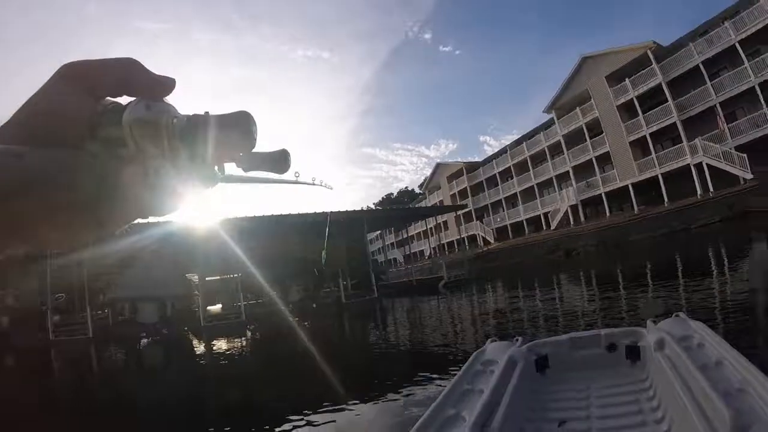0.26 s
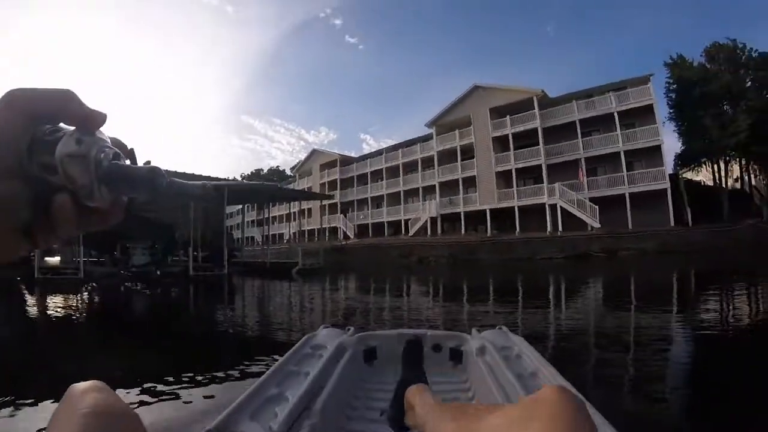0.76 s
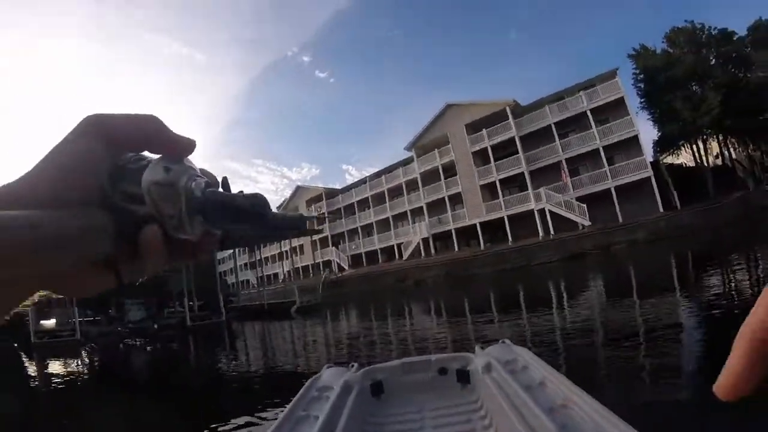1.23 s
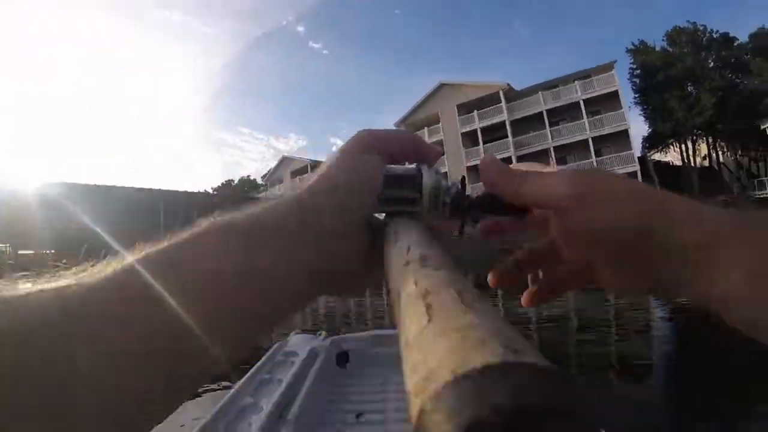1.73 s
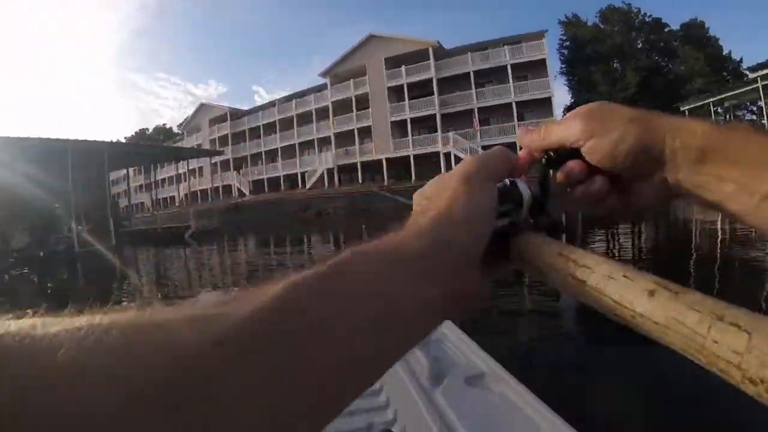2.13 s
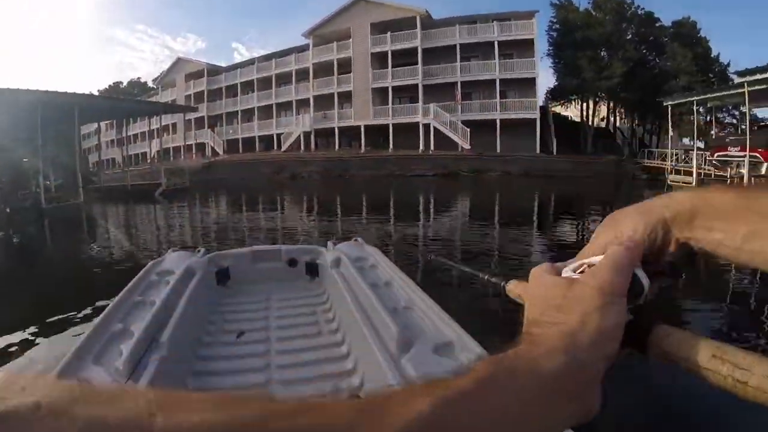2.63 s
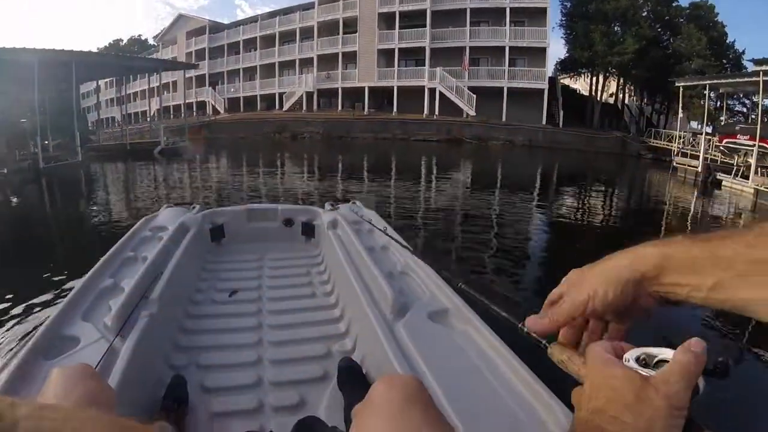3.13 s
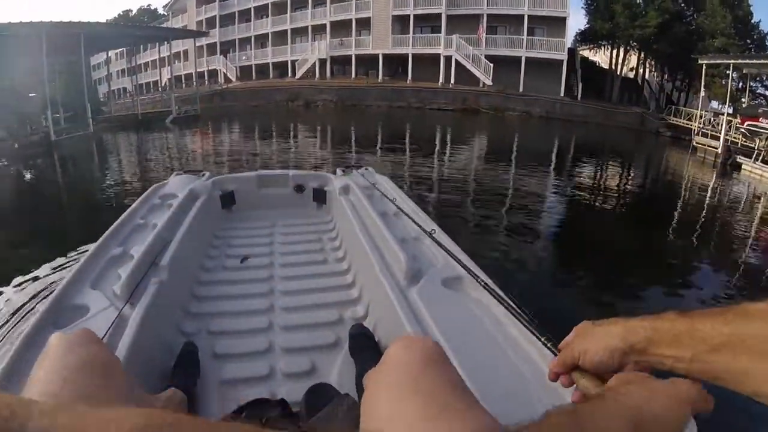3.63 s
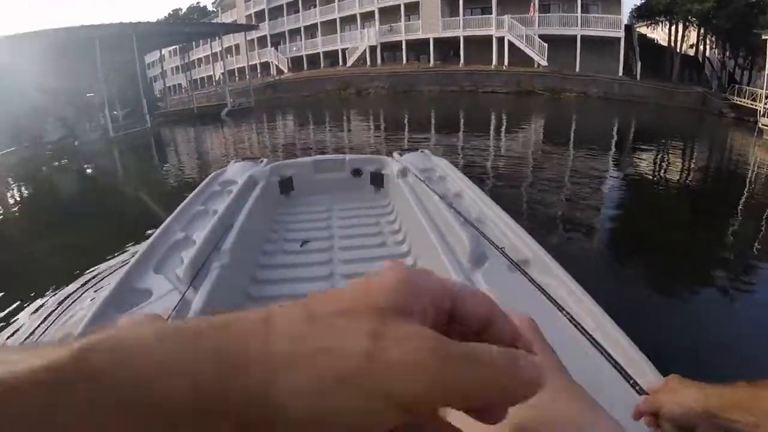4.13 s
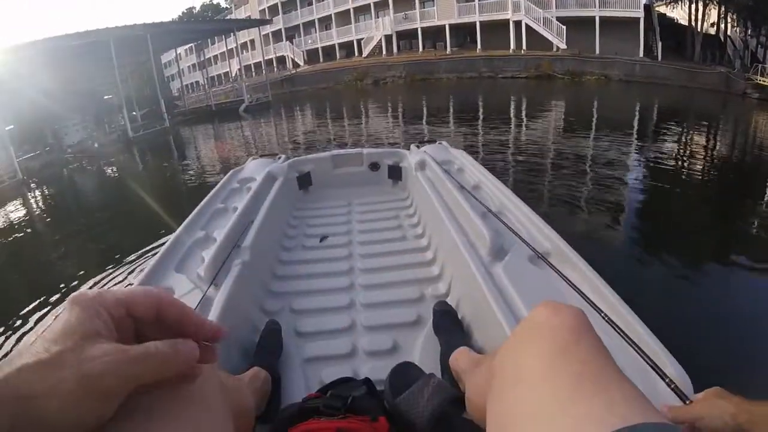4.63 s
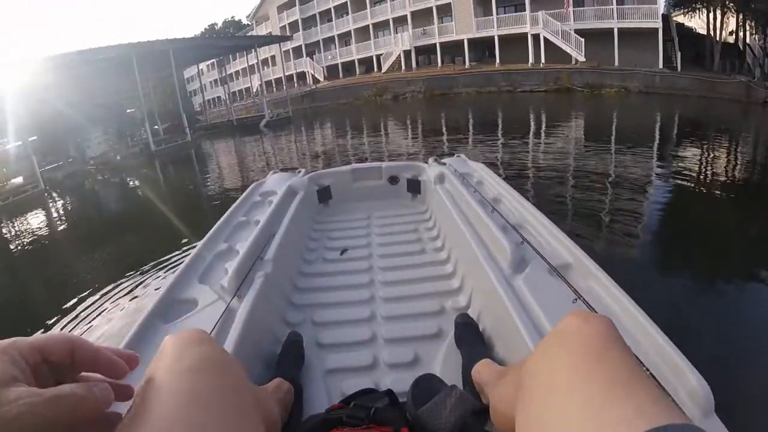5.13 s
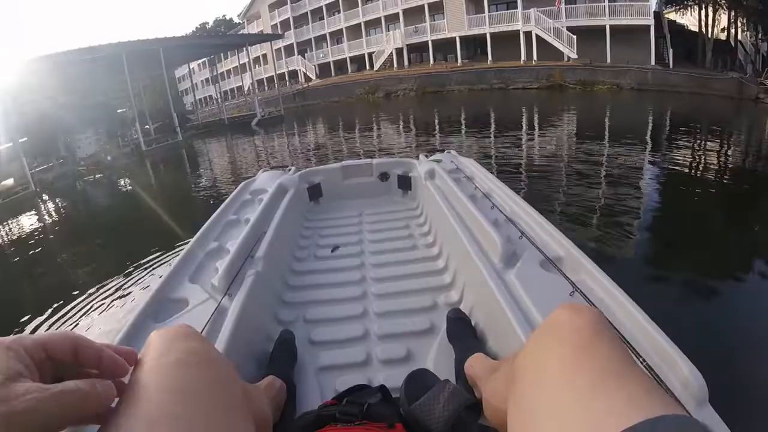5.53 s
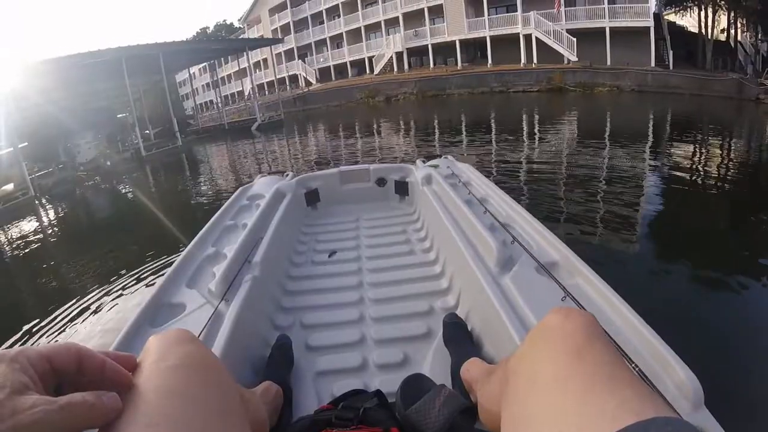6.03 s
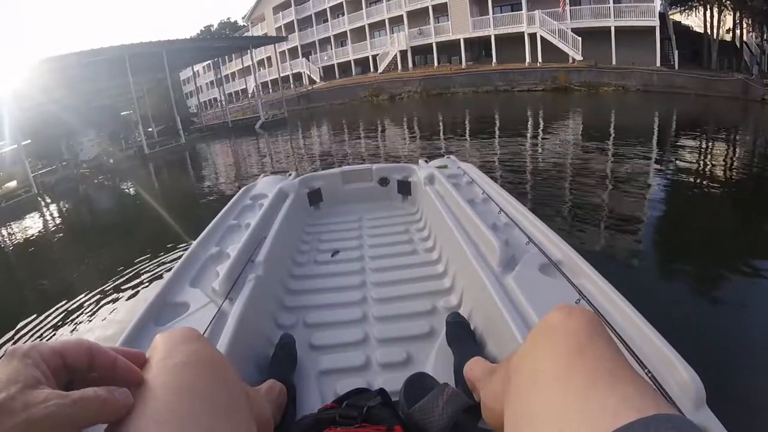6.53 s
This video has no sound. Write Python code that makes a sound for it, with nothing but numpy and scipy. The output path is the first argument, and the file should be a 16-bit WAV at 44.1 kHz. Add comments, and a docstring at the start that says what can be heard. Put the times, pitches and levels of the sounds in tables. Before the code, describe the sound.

Close handling clicks and dull hull knocks from fishing tackle in a plastic boat, with pauses between, above a sinking motor drone and faint buzz.

```python
"""A fishing reel and rod are handled in a plastic kayak on a calm lake: blows ring the damped modes of metal
and plastic parts, which tick, rattle and clink. The rod knocks on the hull, the weight of the paddler thuds it,
the seat creaks by stick-slip and hands rub as dense grains. Behind them a distant engine drones with falling
pitch, a compressor on the shore taps its casing into a buzz, and the air is shaped noise."""
import sys
import numpy as np
from scipy import signal
from scipy.io import wavfile

SR = 44100
rng = np.random.default_rng(int(sys.argv[2]) if len(sys.argv) > 2 else 0)


def elevation(decibels):
    """Turn decibel levels (scalar or array-like) into linear amplitude ratios."""
    levels = np.asarray(decibels, float)
    return 10 ** (levels / 20)


def log_audio(samples):
    """Write samples as a 16-bit WAV file to the path given in sys.argv[1]."""
    # one column per channel
    frames = np.atleast_2d(samples).T
    # limit to full scale, then quantise
    limited = np.clip(frames, -1, 1)
    pcm = np.round(limited * 32767).astype(np.int16)
    wavfile.write(sys.argv[1], SR, pcm)


N = 298557

# modes of the grip: f/Hz, relative level/dB, t60/s
GRIP_MODES = [(590, 9.5, 0.0043), (840, 5.5, 0.0024), (1041, -7, 0.025)]
# modes of the rod blank: f/Hz, relative level/dB, t60/s
ROD_MODES = [(1402, 0.07, 0.018), (1622, 1.5, 0.02), (2005, -1, 0.013)]
# modes of the reel frame: f/Hz, relative level/dB, t60/s
FRAME_MODES = [(2365, 5.5, 0.01), (2840, -1, 0.013), (3260, -3, 0.017), (3644, -0.5, 0.006),
               (4080, -5, 0.0083), (4660, -8.5, 0.012)]
# modes of small reel parts: f/Hz, relative level/dB, t60/s
PART_MODES = [(5120, -2, 0.0043), (5870, 1.5, 0.0065), (6373, 0.5, 0.021), (6615, -3, 0.024),
              (7140, 8, 0.0015), (8730, -7, 0.0036)]
# modes of the hull: f/Hz, relative level/dB, t60/s
HULL_MODES = [(121, -36, 0.2), (167.2, -18.5, 0.17), (205, -17, 0.14), (256, -12, 0.034), (322, -17, 0.084),
              (449.7, -17.5, 0.098), (508, -16, 0.067), (611, -13, 0.069), (798, -21, 0.047),
              (1044, -16, 0.0093)]

RUB_RISE_DB_PER_S = 425
HARD_CONTACT_S = .00002


def rms_one(x):
    """Normalization: scales a signal to unit rms."""
    return x / np.sqrt(np.mean(x ** 2) + 1e-20)


def in_time(rows):
    """Linear interpolation: columns of a curve, sample by sample."""
    s, *columns = np.transpose(rows)
    return [np.interp(np.arange(N) / SR, s, c) for c in columns]


def drift(rate_hz):
    """Low-passed noise: two equal poles at rate_hz leave slow chance of spread 1."""
    pole = np.exp(-80 * np.pi * rate_hz / SR)  # one step is 40 samples
    white = rng.standard_normal(N // 40 + 2002)
    slow = signal.lfilter([1], [1, -2 * pole, pole * pole], white)[2000:]
    return np.interp(np.arange(N) / 40, np.arange(len(slow)), rms_one(slow))


def ring(force, hz, t60):
    """Damped resonator: a unit click sets a decaying sine of height 1 ringing."""
    radius, angle = elevation(-60 / (t60 * SR)), 2 * np.pi * hz / SR
    feedback = [1, -2 * radius * np.cos(angle), radius * radius]
    return signal.lfilter([0, np.sin(angle)], feedback, force + 1e-18)


def narrow(x, hz, width_hz):
    """Resonance: its bandwidth sets its decay time; scaled to rms 1."""
    return rms_one(ring(x, hz, np.log(1000) / (np.pi * width_hz)))


def band(x, low_hz, high_hz):
    """Band-pass filtering: keeps what lies between two corner frequencies."""
    return signal.sosfilt(signal.butter(2, [low_hz, high_hz], "band", fs=SR, output="sos"), x)


def strike(times, levels_db, modes, scatter_db, chatter_s, grit):
    """Modal excitation: a short swell of force, gritty after a sharp touch or smooth, drives every mode."""
    at, out = (np.asarray(times) * SR).astype(int), np.zeros(N)
    # every blow drives every mode with a strength of its own
    scatter = scatter_db * rng.standard_normal((len(at), len(modes)))
    levels_db = np.reshape(levels_db, (len(at), -1)) + scatter
    rise, fade = np.exp(-1 / (0.55 * chatter_s * SR)), np.exp(-1 / (chatter_s * SR))
    swell_gain = np.sqrt(1 - fade ** 2) * (1 - rise)
    swell_poles = np.convolve([1, -fade], [1, -rise])
    first_touch, grit_share = .45, .85
    for k, (hz, level_db, t60) in enumerate(modes):
        blows = np.zeros(N)
        np.add.at(blows, at, elevation(levels_db[:, k] + level_db))
        swell = signal.lfilter([swell_gain], swell_poles, blows + 1e-18)
        if grit:
            touch = first_touch * (-1) ** k * blows
            force = touch + grit_share * swell * rng.choice([-1, 1], N)
        else:
            force = -swell
        out += ring(force, hz, t60)
    return out


def tail(x, decay_s, low_hz, high_hz):
    """Envelope following: loose material shakes on as noise that follows the blow and dies away."""
    shaking = signal.lfilter([1], [1, -np.exp(-1 / (decay_s * SR))], np.abs(x))
    return shaking * band(rng.standard_normal(N), low_hz, high_hz)


def air():
    """Filtered noise: far traffic, water and microphone hiss in half-octave bands that each flicker."""
    # spectrum of the background: f/Hz, relative density/dB per Hz
    spectrum = [(13, -41), (22, -40), (58, -1.5), (177, -3.5), (259, -10.5), (349, -11.5), (950, -31.5),
                (2140, -32), (3680, -38.5), (4330, -42.5), (5830, -26), (8990, -48.5), (10300, -51),
                (12400, -61), (14200, -72)]
    overall_db, fall_db_per_s = -45, 0.4
    table_hz, table_db = np.transpose(spectrum)
    edges = 22 * 2 ** np.arange(0, 9.6, .5)
    together = drift(1.2)
    white = rng.standard_normal((2, N))  # neighbouring bands take different noise
    out = 0
    for k, (low, high) in enumerate(zip(edges, edges[1:])):
        level_db = np.interp(np.log(low * high) / 2, np.log(table_hz), table_db)
        flicker_db = 1.2 * together + 2.46 * drift(16.6)
        out = out + elevation(level_db + flicker_db) * band(white[k % 2], low, high)
    return elevation(overall_db - fall_db_per_s * np.arange(N) / SR) * rms_one(out)


def engine():
    """Harmonic synthesis: three shaft multiples carry over the water and waver in the air."""
    # course of the engine: t/s, shaft f/Hz, then level/dB of the fifth, sixth and eighth multiple
    course = [(0, 30.05, -46, -46, -63), (.9, 29.36, -47, -47, -60), (1.5, 28.14, -56, -48.5, -74),
              (2.5, 26.7, -53.5, -47.5, -53), (3.1, 25.8, -63, -45, -48), (4.15, 25.25, -52, -51.5, -46),
              (5.4, 24.87, -63, -49, -44), (6.77, 24.52, -75, -54.5, -45)]
    hz, *levels_db = in_time(course)
    turn = 2 * np.pi * np.cumsum(hz * (1 + 0.0011 * drift(1.75))) / SR
    out = 0
    for multiple, db in zip((5, 6, 8), levels_db):
        out = out + elevation(db + 1.2 * drift(1.74)) * np.sqrt(2) * np.sin(multiple * turn)
    return out


def drones():
    """Narrow-band noise: resonances filled with noise give further low drones."""
    # drones: f/Hz, width/Hz, level/dB, fall/dB per s
    drone_rows = [(62.1, 2.7, -48.5, -0.1), (106.1, 5.0, -47.5, 3.0), (123.3, 3.7, -55.5, -0.5),
                  (352.2, 8, -64.5, -0.2)]
    out = 0
    for hz, width, db, fall_db in drone_rows:
        level_db = db - fall_db * np.arange(N) / SR
        out = out + elevation(level_db) * narrow(rng.standard_normal(N), hz, width)
    return out


def compressor():
    """Periodic excitation: a strong and a weak valve tap per turn, with some hiss, ring the casing."""
    # resonances of the casing: f/Hz, width/Hz, level before shading/dB
    casing = [(2096, 27, -72), (2615, 40, -79.5), (3004, 76, -82), (3675, 230, -75.5), (4620, 110, -70.5),
              (5090, 83, -68.5), (5655, 63, -71), (6400, 75, -72)]
    # shading of the buzz: t/s, then level/dB from 2.4 to 4.2 kHz, to 5.3 kHz, to 6 kHz, above
    shading = [(0, 5, 0, -9, 5), (.7, 8, -0.5, 8, 4), (1.5, 1.5, 2, 7.5, 7.5), (2.1, 1.5, 0.5, 2, 4),
               (2.4, 7.5, -14, 10, 4), (3.4, 9.5, 3, 10, 6.5), (3.6, 8.5, -20, 8.5, 8),
               (5.5, 9, -28, 3.5, -15), (6.1, 5.5, -12, 4, -14), (6.77, 7, -3, 2, -9)]
    mean_turns_hz = 58.09
    phase = np.cumsum(2 * mean_turns_hz * (1 + 0.0004 * drift(4.0))) / SR
    count = np.floor(phase)
    tap = np.diff(count, prepend=0) * np.where(count % 2, .35, 1)
    force = tap * elevation(0.13 * drift(22.0)) + elevation(-39.5) * rng.standard_normal(N)
    shading_db = [0, *in_time(shading)]  # the lowest resonance is steady
    out = 0
    for hz, width, db in casing:
        region = np.searchsorted([2400, 4200, 5300, 6000], hz)
        out = out + elevation(db + shading_db[region]) * narrow(force, hz, width)
    return out


def thuds():
    """Bending vibration: the paddler's weight pushes slowly and bends the hull as a whole."""
    # thuds: t/s, strength/dB
    pushes = [(0.452, -35), (1.364, -27), (1.98, -32), (4.29, -33), (6.313, -23.5)]
    # bending modes of the hull: f/Hz, relative level/dB, t60/s
    bending_modes = [(41, -31, 0.37), (56.7, -30.5, 0.24), (86.8, -24, 0.27)]
    s, strength_db = np.transpose(pushes)
    out = strike(s, strength_db, bending_modes, scatter_db=4.5, chatter_s=0.0015, grit=False)
    return band(out, 42, 400)


def slide():
    """Sliding friction: cloth drives the seat resonances with noise that starts fast and dies away."""
    # resonances of the seat under cloth: f/Hz, width/Hz, relative level/dB, fall/dB per s
    seat_rings = [(550, 130, 2.5, 56), (824, 120, 2.5, 57), (2260, 220, -9, 22.5)]
    start_s, start_db = 1.335, -51.5
    after = np.arange(N) / SR - start_s
    level_db = start_db - RUB_RISE_DB_PER_S * np.clip(-after, 0, 1) + 2.0 * drift(26.0)
    out = 0
    for hz, width, db, fall_db in seat_rings:
        gain = elevation(level_db + db - fall_db * np.clip(after, 0, 4))
        out = out + gain * narrow(rng.standard_normal(N), hz, width)
    return out


def creak(count=7):
    """Stick-slip: evenly spaced slips ring the seat, then a last, stronger one as the load settles."""
    start_s, gap_s, settle_s, settle_db = 1.228, .0152, 1.38, -34.5
    loudest_s, loudest_db, sag_db_per_s = 1.282, -38, 154
    s = start_s + gap_s * np.arange(count)
    slip_db = loudest_db - sag_db_per_s * np.abs(s - loudest_s)
    # modes of the seat: f/Hz, relative level/dB, t60/s
    seat = [(750, -2, 0.077), (970, 6, 0.029), (1390, 2.0, 0.022), (2280, -18, 0.02)]
    return strike([*s, settle_s], [*slip_db, settle_db], seat, scatter_db=0.0, chatter_s=0.0014, grit=True)


def rubbing():
    """Exponential envelopes: gains of low and high rustle, as each rub rises fast, holds and fades."""
    # rubs of the hands: t of the firmest touch/s, low level/dB, high level/dB, time held/s
    rubs = [(.4, -39.5, -50, 0.019), (.51, -50.5, -55, .03), (1.25, -54, -64, 0.079),
            (1.928, -76, -80, 0.04), (2.86, -51.5, -66, 0.14), (3.06, -61, -67, 0.04),
            (3.31, -57, -73, 0.034), (3.42, -58, -69, 0.08), (3.99, -45, -62, 0.022),
            (4.14, -56.5, -77, 0.06), (4.32, -44, -60, 0.085), (4.45, -46, -48.5, 0.013),
            (5.0, -42, -50.5, 0.012), (5.12, -50, -61, 0.042), (6.27, -49.5, -57, 0.014)]
    fall_db_per_s = 91
    t = np.arange(N) / SR
    low, high = elevation(-72), elevation(-65.5)  # hands at rest still fidget
    for s, low_db, high_db, held_s in rubs:
        rise_db = -RUB_RISE_DB_PER_S * np.clip(s - t, 0, 1)
        fall_db = -fall_db_per_s * np.clip(t - s - held_s, 0, 1)
        shape = elevation(rise_db + fall_db)
        low, high = low + elevation(low_db) * shape, high + elevation(high_db) * shape
    return low, high


def rustle():
    """Granular friction: dense clumped grains ring hull, grip and blank (low) or blank and reel (high)."""
    low_modes = HULL_MODES[4:] + GRIP_MODES + ROD_MODES[1:2]
    high_modes = ROD_MODES[2:] + FRAME_MODES + PART_MODES
    grains_per_s = 1800
    out = 0
    for gain, modes in zip(rubbing(), (low_modes, high_modes)):
        size_db = 1.1 * np.minimum(rng.exponential(1, N), 4) + 2.36 * drift(45.0)
        sizes = elevation(size_db) * rng.choice([-1, 1], N)
        grains = sizes * (rng.random(N) < grains_per_s / SR)
        rings = 0
        for k, (hz, _, t60) in enumerate(modes):  # all modes equally strong, damped by the hand
            rings = rings + rms_one(ring(grains, hz, 0.45 * t60)) * (-1) ** k
        out = out + gain * rms_one(rings)
    return out


def knocks():
    """Local excitation: a soft inward push on the hull favours modes near the pitch of the struck spot."""
    # knocks: t/s, strength/dB, f around which the struck spot rings/Hz
    hull_knocks = [(1.338, -33, 352), (1.372, -43, 121), (2.944, -33, 480), (3.226, -29.5, 463),
                   (3.937, -25.5, 520), (4.278, -16, 535), (4.284, -28, 506), (4.311, -17, 560),
                   (4.322, -24, 596), (4.330, -34, 600), (4.362, -23.5, 483), (4.408, -28, 430),
                   (4.434, -26.5, 203), (4.983, -14, 550), (4.993, -23, 452), (5.056, -17.5, 464),
                   (5.056, -7, 202), (5.059, -20, 114), (5.067, -19, 172), (5.080, -24, 298),
                   (5.122, -15, 237), (5.144, -28, 251.5), (5.157, -20, 196), (5.176, -22, 816),
                   (5.19, -30.5, 806), (5.216, -21, 590), (5.228, -26, 800), (5.241, -24, 302),
                   (5.262, -34, 760), (5.437, -21, 372), (5.501, -30, 347), (5.54, -29, 340),
                   (6.239, -28.5, 350), (6.252, -28.5, 452), (6.282, -18, 345), (6.305, -26, 201),
                   (6.332, -26.5, 171), (6.358, -28, 150), (6.757, -35, 250)]
    s, strength_db, spot_hz = np.transpose(hull_knocks)
    octaves = np.log2(np.array(HULL_MODES)[:, 0] / spot_hz[:, None])
    levels_db = strength_db[:, None] - 24.4 * octaves ** 2
    out = strike(s, levels_db, HULL_MODES, scatter_db=1.5, chatter_s=0.00013, grit=False)
    out = band(out, 85, 3400)  # the hull radiates no deep bass
    return out + elevation(-49.0) * tail(out, 0.053, 66, 304)


def clinks():
    """Local excitation: a hard blow on thin metal favours modes near the pitch of the struck spot."""
    # clinks: t/s, strength/dB, f around which the struck spot rings/Hz
    metal_blows = [(0.498, -28, 2050), (0.51, -28, 3030), (0.556, -28, 2080), (2.93, -21, 3570),
                   (3.936, -24, 3152), (4.311, -25.5, 3040), (4.982, -28, 2620), (4.991, -32, 2520),
                   (5.079, -41, 3085)]
    # modes of thin metal on the rod: f/Hz, relative level/dB, t60/s
    metal_modes = [(2050, 1, 0.03), (2440, -2.5, 0.053), (3055, -0.5, 0.035), (3560, -7, 0.03),
                   (4800, 7, .04)]
    s, strength_db, spot_hz = np.transpose(metal_blows)
    octaves = np.log2(np.array(metal_modes)[:, 0] / spot_hz[:, None])
    levels_db = strength_db[:, None] - 140.0 * octaves ** 2
    return strike(s, levels_db, metal_modes, scatter_db=1.2, chatter_s=HARD_CONTACT_S, grit=False)


def handle():
    """Repeated impact: a loose handle bounces on the reel ever sooner; short contacts ring arm and knob."""
    # bounces: t/s, strength/dB
    bounces = [(4.434, -22.5), (4.4548, -28), (4.4748, -28), (4.4897, -31), (4.5002, -34.5), (4.5085, -40)]
    # modes of the handle, the arm first, then the knob: f/Hz, relative level/dB, t60/s
    handle_modes = [(1030, -4.5, 0.043), (3260, -20, 0.025), (3600, 5.5, 0.024), (3670, 0, 0.014),
                    (4280, -0.5, 0.02), (4880, -3, 0.017), (6100, -6, 0.016), (6300, 1, .016),
                    (6580, 3.5, .014), (7260, -15, 0.011)]
    s, strength_db = np.transpose(bounces)
    hard = dict(scatter_db=1.0, chatter_s=HARD_CONTACT_S, grit=False)
    arm = band(strike(s, strength_db, handle_modes[:1], **hard), 870, 1400)
    knob = strike(s, strength_db, handle_modes[1:], **hard)
    knob = band(band(knob, 3000, 12000), 3000, 12000)
    loose_play = elevation(-29.0) * tail(knob, 0.0016, 2350, 5600)
    return arm + knob + loose_play


def rod_taps():
    """Modal response: grip and blank answer a tap on the rod, then loose material shakes on."""
    # taps: t/s, blank level/dB, grip level above the blank/dB
    taps = [(0.09, -58, 22), (0.1275, -56.5, 20), (0.386, -28, -17), (0.401, -34, 6), (0.414, -41, 13),
            (0.422, -32.5, 10.5), (0.4934, -27.5, -1), (0.512, -33, 8.5), (0.514, -29, -3),
            (0.5535, -32, -4), (0.5897, -26, -10), (0.6287, -34, -8), (.762, -39.5, -17),
            (1.9098, -58, 20.5), (1.9345, -38.5, -3), (1.945, -51.5, 16), (1.98, -49, 20),
            (2.0484, -48, 12.5), (2.2773, -68, 33), (2.781, -31.5, -23), (2.8316, -33, -7),
            (2.8616, -39, 6), (2.9026, -32, 3), (2.932, -25, -11), (2.959, -37, 1), (2.9975, -31.5, -25),
            (3.075, -39, -13), (3.156, -41, 10.5), (3.2199, -27.5, -33), (3.287, -25, -2),
            (3.415, -33.5, -5), (3.429, -44, 3), (3.482, -43, -2), (3.5945, -45, 13), (3.9354, -16, -3),
            (3.9782, -28, 4), (3.992, -29, 3), (4.024, -32, -1.5), (4.0556, -24, -6), (4.1088, -41, -19),
            (4.256, -46, 11), (4.2754, -29.5, -1), (4.309, -27, 6.5), (4.373, -30, -15), (4.4, -19.5, -7),
            (4.4332, -28, 4), (4.4736, -40, -2), (4.4913, -37, 9), (4.535, -59, 24), (4.5586, -52, 21.5),
            (4.669, -48, 14), (4.986, -33, 7.5), (4.99, -32, 16), (5.038, -35, -17), (5.0547, -25.5, 4.5),
            (5.1222, -34.5, 13), (5.1342, -29.5, 0.5), (5.175, -44.5, 19.5), (5.2265, -28, -15),
            (5.244, -32, -20), (5.261, -43, -4), (5.362, -30.5, -18), (5.4355, -28.5, 6),
            (5.492, -25.5, -15), (5.512, -30, -11), (5.537, -40, 6), (6.2198, -41.5, -4), (6.265, -47, -5),
            (6.283, -40, -11), (6.306, -29.5, -27), (6.322, -40, -23), (6.4832, -44, 4), (6.587, -50, -2),
            (6.754, -39.5, -14), (6.7602, -40, 7)]
    s, rod_db, grip_db = np.transpose(taps)
    out = strike(s, rod_db + grip_db, GRIP_MODES, scatter_db=2.0, chatter_s=.002, grit=True)
    out += strike(s, rod_db, ROD_MODES, scatter_db=0.5, chatter_s=.002, grit=True)
    out = band(out, 330, 2900)  # cork and graphite damp the treble
    return out + elevation(-43.0) * tail(out, 0.011, 730, 2090)


def reel_ticks():
    """Modal response: frame and small parts answer a tick of the reel, then loose material shakes on."""
    # ticks: t/s, frame level/dB, small parts level above the frame/dB
    tick_rows = [(.387, -32, 3.5), (0.401, -25.5, -16), (0.413, -32.5, 6), (0.424, -27, -6),
                 (0.4588, -32, -16), (0.4933, -24, -12.5), (0.4961, -31.5, 14), (0.5081, -30, 10.5),
                 (0.516, -38, 15), (0.529, -37, 8), (0.549, -35, 1), (0.5543, -23.5, -15),
                 (0.5864, -27, -1), (0.5994, -24.5, -10), (0.6291, -38, 7), (0.639, -36, -8),
                 (.762, -46, 1), (0.8261, -37.5, -8.5), (1.882, -42, -8), (1.934, -39, -7), (2.782, -38, 5),
                 (2.833, -38.5, 10.5), (2.9016, -26.5, -11), (2.931, -18.5, -4), (2.962, -33, -7),
                 (2.978, -35, -7), (2.9966, -26, -11), (3.1316, -44, 7), (3.2203, -43, 2), (3.287, -22, -4),
                 (3.9348, -23.5, -23.5), (3.986, -47.5, 1), (4.016, -35.5, -16), (4.054, -21.5, -12.5),
                 (4.277, -32, -6.5), (4.299, -34, -10), (4.307, -29, 6.5), (4.374, -24, 0.5),
                 (4.354, -32, -16), (4.398, -30, 6), (4.402, -20, -15), (4.424, -20, -14),
                 (4.4345, -19, -3), (4.578, -40, -11), (4.5965, -38.5, -10), (4.9819, -25, -16),
                 (4.9908, -27, -9), (4.976, -44, -5), (5.006, -35.5, 2), (5.016, -37.5, 2), (5.036, -38, 4),
                 (5.055, -31, -17), (5.068, -32.5, 4.5), (5.0739, -30, 0), (5.096, -26, 0),
                 (5.1218, -34, -11), (5.1337, -19.5, -12), (5.154, -27, -13), (5.166, -32, -13),
                 (5.1885, -39, -15), (5.2264, -24.5, -10), (5.362, -34, 3.5), (5.434, -22.5, -1.5),
                 (5.4634, -39.5, -2), (5.492, -31, -15), (5.539, -37, -12), (6.22, -32, -6),
                 (6.303, -26.5, 3.5), (6.322, -35, -0.5), (6.4844, -41, -4), (6.588, -46, -6),
                 (6.754, -37, -4)]
    s, frame_db, parts_db = np.transpose(tick_rows)
    # a blow near the small parts favours the upper frame modes
    octaves = np.log2(np.array(FRAME_MODES)[:, 0] / 3400)
    slope_db = 1.74 * np.clip(parts_db + 16.0, -15, 15)[:, None] * octaves
    gritty = dict(scatter_db=1.5, chatter_s=.0013, grit=True)
    out = strike(s, frame_db[:, None] + slope_db, FRAME_MODES, **gritty)
    out += strike(s, frame_db + parts_db, PART_MODES, **gritty)
    out = band(out, 2340, 18000)  # small bodies radiate nothing low
    return out + elevation(-41.5) * tail(out, 0.0054, 1600, 4760)


def scene():
    """Superposition: the pressures of all sources add at one microphone."""
    background = air() + engine() + drones() + compressor()
    kayak = thuds() + slide() + creak() + rustle() + knocks()
    tackle = clinks() + handle() + rod_taps() + reel_ticks()
    return (background + kayak + tackle)[None]


def low_pass(x):
    """Removes everything above the highest recorded frequency."""
    return signal.sosfilt(signal.butter(12, 14400, fs=SR, output="sos"), x)


def record(dry):
    """Cavity resonance: the microphone port resonates, the treble falls above; the preamplifier hisses."""
    port = ring(dry, 6800, 0.0028) * elevation(-31.0)
    dull = signal.sosfilt(signal.butter(2, 8500, fs=SR, output="sos"), dry + port)
    hiss = elevation(-70.5) * band(rng.standard_normal(N), 6400, 13600)
    steep = signal.cheby2(8, 40, 14800, fs=SR, output="sos")
    mix = signal.sosfilt(steep, dull + hiss)
    return low_pass(mix)


dry = scene()
out = record(dry)
log_audio(out)
```